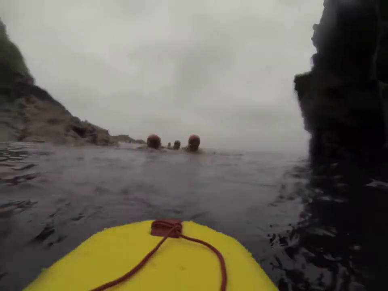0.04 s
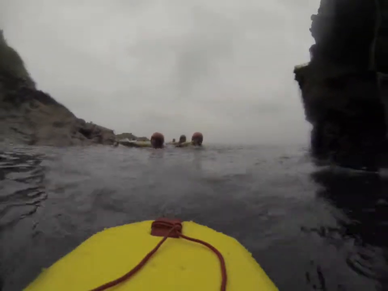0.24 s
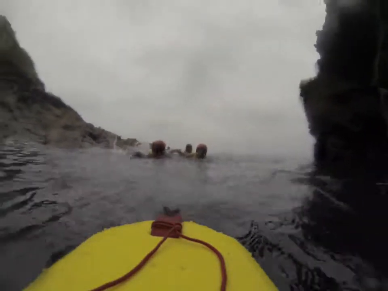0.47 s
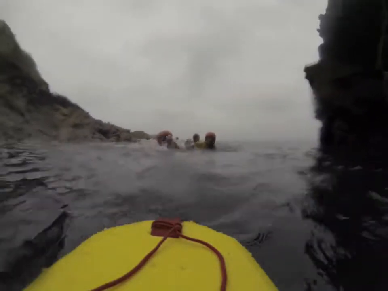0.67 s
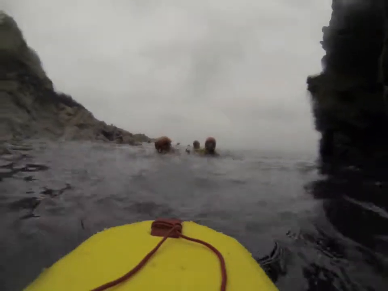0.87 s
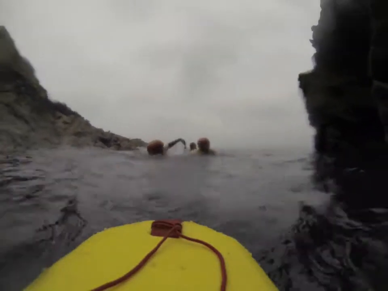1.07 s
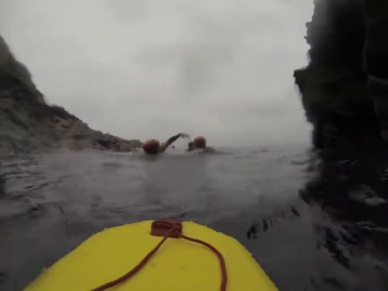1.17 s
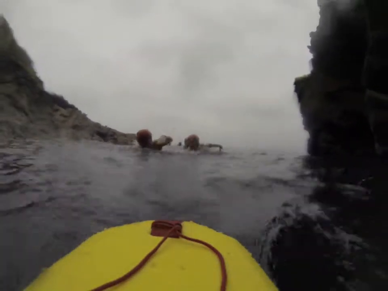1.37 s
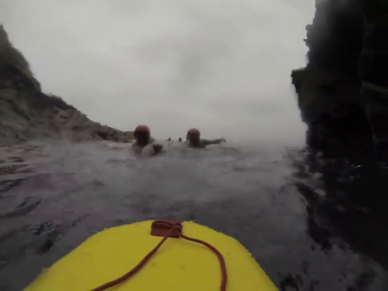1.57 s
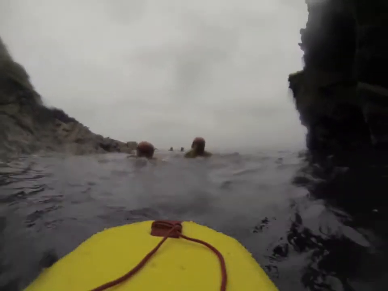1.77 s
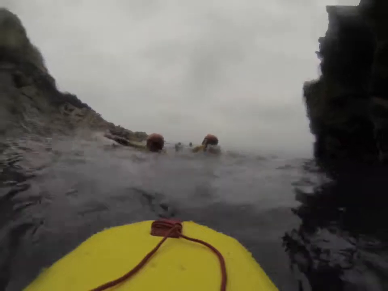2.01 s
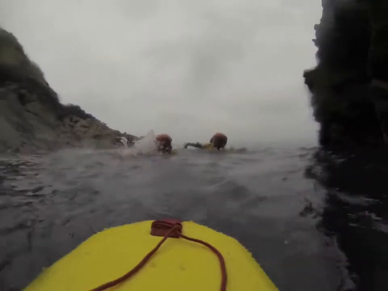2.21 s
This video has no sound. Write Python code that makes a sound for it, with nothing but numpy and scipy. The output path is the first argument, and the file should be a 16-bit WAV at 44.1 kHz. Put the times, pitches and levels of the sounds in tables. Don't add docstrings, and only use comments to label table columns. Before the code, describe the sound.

Choppy sea water slaps and thumps dully against a floating board, heard through a sealed housing

```python
import sys
import numpy as np
from scipy import signal
from scipy.fft import rfft, irfft
from scipy.io import wavfile
from scipy.ndimage import uniform_filter1d

SR = 44100
rng = np.random.default_rng(int(sys.argv[2]) if len(sys.argv) > 2 else 0)


def bounce(signal):
    frames = np.transpose(np.atleast_2d(signal))
    limited = np.clip(frames, -1, 1)
    pcm = np.round(limited * 32767).astype(np.int16)
    wavfile.write(sys.argv[1], SR, pcm)


def gain_from_decibels(decibels):
    exponent = np.asarray(decibels, float) / 20
    return 10 ** exponent


N = 99225

# t/s, peak level/dB, f/Hz, swell time/s
HEAVES = [(0.0, -37.5, 24, 0.046), (0.17, -38, 24, 0.05), (0.325, -26.5, 23.45, 0.041),
          (0.47, -32, 25, 0.031), (0.602, -19.5, 23, 0.031), (0.775, -38, 27, 0.03),
          (0.895, -28.5, 24.6, 0.031), (1.145, -57, 25.7, 0.014), (1.21, -45, 24, 0.063),
          (1.28, -40.5, 26.4, 0.045), (1.345, -39, 21.6, .04), (1.445, -35, 29.1, 0.051),
          (1.56, -33.5, 24.8, 0.024), (1.66, -34, 24, 0.022), (1.845, -25.5, 21.6, 0.028),
          (1.95, -35.5, 23.2, 0.032), (2.13, -37.5, 24, 0.062)]
# t/s, peak level/dB, f/Hz, swell time/s
SLAPS = [(0.5825, -15.5, 66, 0.006), (0.5852, -19, 180, 0.003), (0.5825, -29.5, 350, 0.0035),
         (0.606, -38, 200, .005), (0.9075, -41, 370, .004), (0.847, -47, 400, .002),
         (1.131, -49, 440, .003), (1.288, -47, 150, .004), (0.316, -46, 330, .003), (0.283, -47, 330, .003),
         (0.727, -52, 441, .004), (2.056, -50, 270, .004), (2.078, -36, 60, .006),
         (0.9065, -28.5, 100, 0.004), (0.9105, -32.5, 230, 0.004), (1.1345, -40, 202, 0.0045),
         (1.3295, -35.5, 107, 0.0031), (1.333, -34.5, 218, 0.0037), (2.0825, -29.5, 170, 0.0037)]
# t/s, peak level/dB, f/Hz, swell time/s
THUMPS = [(0.18, -45, 79, 0.011), (0.245, -35, 60, 0.0062), (0.293, -30, 83, 0.0092),
          (0.36, -51, 93.5, .01), (0.602, -25, 45, 0.007), (0.606, -33, 92, 0.007), (0.7, -46, 90, .01),
          (0.78, -48.5, 88.6, .01), (1.38, -51, 90, .008), (1.452, -37, 69.5, 0.0057),
          (1.784, -39, 63.6, 0.0081), (1.82, -27.5, 70, 0.0066), (2.1, -39, 69.6, .006)]
# t/s, peak level/dB, f/Hz, swell time/s
KNOCKS = [(0.015, -43, 185, 0.0035), (0.164, -46.5, 206, 0.0085), (0.195, -48, 210, 0.0068),
          (0.233, -36.5, 220, 0.003), (0.26, -37.5, 220, 0.004), (0.284, -40, 212, 0.0055),
          (0.318, -42, 221, 0.0013), (0.335, -38, 205, 0.0054), (0.39, -46, 232, 0.0046),
          (0.08, -57, 203, 0.011), (0.49, -50, 199, 0.0057), (0.52, -48, 202, .008),
          (0.645, -42, 207, 0.0042), (0.694, -41.5, 193, 0.0035), (0.775, -46, 210, 0.0073),
          (0.856, -45, 224, 0.0054), (0.925, -43, 190, 0.004), (1.365, -40.5, 205, 0.0051),
          (1.452, -48, 205, 0.0039), (1.772, -36, 221, 0.0033), (1.803, -29, 225, 0.0043),
          (1.83, -35, 211, 0.0033), (1.985, -51, 202, 0.0067)]
# f/Hz, t60/s, level/dB
HULL_MODES = [
    (24, 0.24, 7),
    (55, 0.053, 0.5),
    (82, 0.06, -0.5),
    (205, 0.037, -3.5),
]
# t/s, peak level/dB, f/Hz, swell time/s
DROPS = [(0.331, -40, 1438, 0.0028), (0.615, -44, 1570, 0.0022), (0.8465, -28.5, 1402, 0.0018),
         (0.853, -49, 1520, 0.0024), (0.8475, -48.5, 3600, 0.0014), (0.847, -72, 13900, .0015),
         (0.8458, -62, 8000, .0007), (0.846, -63, 9700, .0007), (0.915, -46.5, 3370, 0.0025),
         (0.9125, -43, 1300, 0.0053), (0.911, -50, 656, .003), (1.083, -44.5, 1730, 0.0019),
         (1.097, -54.5, 6700, 0.0011), (1.097, -64, 9900, 0.00081), (1.097, -42, 880, 0.0014),
         (1.098, -53, 3700, 0.0016), (1.329, -45, 606, 0.0022), (1.683, -47, 2300, 0.0013),
         (1.754, -49, 2300, .0012), (1.33, -43, 1300, .001), (1.865, -51, 2250, .002),
         (1.94, -55, 2300, .002), (1.645, -57, 3700, .0015), (1.655, -58, 5000, .0015),
         (2.083, -52, 3300, .001), (2.116, -50, 2250, .0012), (2.128, -51, 3500, .0012),
         (2.148, -53, 4500, .0012), (2.136, -58, 6400, .001), (1.805, -50.5, 455, 0.005),
         (1.989, -38, 1290, 0.0015), (2.023, -40, 1420, 0.0015), (2.09, -47, 3630, 0.0013),
         (2.149, -46.5, 2250, 0.0016), (2.22, -52, 649, 0.016)]
# t/s, peak level/dB, start f/Hz, swell time/s
BUBBLES = [
    (0.8462, -52, 10000, 0.0012),
    (1.445, -57.5, 6800, 0.0008),
]
# t/s, level/dB, swell time/s
SPRAYS = [(0.39, -63, 0.011), (1.08, -64, .004), (1.602, -57, 0.003), (1.64, -58, 0.01), (1.675, -63, .005),
          (1.86, -62, .02), (2.066, -61, .003), (2.081, -56, 0.003), (2.089, -55, .003), (2.103, -60, .004),
          (2.114, -60, 0.003), (2.134, -57, 0.004), (2.142, -58, .003), (2.148, -55, 0.004),
          (2.158, -61, .012)]
# t/s, level/dB
CHOP = [(0, 1.5), (.1, 0), (.35, 8), (.5, 1.5), (.8, 3), (.95, -1), (1.05, -6), (1.25, -5), (1.45, 0),
        (1.53, -8), (1.65, -10), (1.85, 7.5), (2.0, 2), (2.15, -3.5), (2.25, -6)]
# t/s, level/dB
WASH = [
    (0.0, -54.5),
    (0.13, -55),
    (0.34, -53.5),
    (0.94, -51),
    (1.07, -53.5),
    (1.32, -53.5),
    (2.06, -52),
    (2.25, -52.5),
]
# f/Hz, level/dB per Hz
WALLS = [(100, -10), (300, -8.5), (600, -15.5), (1000, -19), (2000, -18), (5500, -33), (10000, -37.5),
         (15000, -42.5)]
# f/Hz, width/Hz, level/dB
CAVITY = [(802, 227, -10), (1384, 307, -0.5), (2290, 260, -17.5), (3547, 680, -13.5), (4940, 740, -24.5),
          (6340, 650, -28.5), (7600, 610, -34.5), (11100, 440, -39)]


def rms_one(x):
    return x / np.sqrt(np.mean(x ** 2) + 1e-20)


def drift(rate_hz):
    r = np.exp(-2 * np.pi * rate_hz * 40 / SR)
    noise = rng.standard_normal(N // 40 + 2002)
    slow = signal.lfilter([1], [1, -2 * r, r * r], noise)[2000:]
    return np.interp(np.arange(N) / 40, np.arange(len(slow)), rms_one(slow - slow.mean()))


def over_time(table):
    t_s, level_db = np.transpose(table)
    return np.interp(np.arange(N) / SR, t_s, level_db)


def band(x, band_hz):
    return signal.sosfilt(signal.butter(2, band_hz, "band", fs=SR, output="sos"), x)


def swell(start_s, swell_s):
    t = np.maximum(np.arange(N) / SR - start_s, 0)
    return t, t / swell_s * np.exp(1 - t / swell_s)


def rings(rows, order=1, rise_per_s=0):
    out = np.zeros(N)
    for start_s, peak_db, hz, swell_s in rows:
        t, shape = swell(start_s, swell_s)
        glide = 1 + rise_per_s * np.minimum(t, 4 * swell_s) / 2
        out += gain_from_decibels(peak_db) * shape ** order * np.sin(2 * np.pi * hz * t * glide)
    return out


def case(x):
    hz = np.maximum(np.fft.rfftfreq(N, 1 / SR), 20)
    wall_hz, wall_db = np.transpose(WALLS)
    power = gain_from_decibels(2 * np.interp(np.log(hz), np.log(wall_hz), wall_db))
    for centre_hz, width_hz, db in CAVITY:
        power = power + gain_from_decibels(2 * db) / (1 + (2 * (hz - centre_hz) / width_hz) ** 4)
    low_cut = hz ** 2 / (hz ** 2 + 60 ** 2)
    return irfft(rfft(x) * np.sqrt(power) * low_cut, N)


def board():
    return rings(HEAVES) + rings(THUMPS) + rings(KNOCKS) + rings(SLAPS, order=2)


def drops():
    return rings(DROPS, order=2)


def bubbles():
    return rings(BUBBLES, order=2, rise_per_s=70)


def spray():
    bright = band(rng.standard_normal(N), (2800, 14000))
    bursts = np.zeros(N)
    for start_s, level_db, swell_s in SPRAYS:
        bursts += gain_from_decibels(level_db) * swell(start_s, swell_s)[1]
    grain_db = 3 * drift(105)
    return case(bright * bursts * gain_from_decibels(grain_db)) / np.std(case(bright))


def ripples():
    laps_per_s, lap_db, patchy_db = 99, -61, 3.5
    out = np.zeros(N)
    for hz, t60_s, mode_db in HULL_MODES:
        taps = (rng.random(N) < laps_per_s / SR) * rng.standard_normal(N) + 1e-18
        soft_taps = uniform_filter1d(taps, int(SR / hz / 2))
        r, w = gain_from_decibels(-60 / (t60_s * SR)), 2 * np.pi * hz / SR
        ring = signal.lfilter([1], [1, -2 * r * np.cos(w), r * r], soft_taps)
        ring = signal.lfilter([1, -1], [1, -.998], ring)
        out += gain_from_decibels(mode_db + patchy_db * drift(5.7)) * rms_one(ring)
    return gain_from_decibels(lap_db + over_time(CHOP)) * out


def slosh():
    water = rms_one(band(rng.standard_normal(N), (310, 980)))
    return gain_from_decibels(-66 + 1.17 * over_time(CHOP) + 2.27 * drift(25)) * water


def gurgles():
    per_s, level_db, low_hz, high_hz = 30, -57, 420, 1700
    at, height, quiet, length = rng.random((int(per_s * N / SR), 4)).T
    start_s = at * N / SR
    peak_db = level_db + np.interp(start_s, *np.transpose(CHOP)) / 2 - 8 * quiet
    hz = low_hz * (high_hz / low_hz) ** height
    swell_s = .006 + .014 * length
    return rings(zip(start_s, peak_db, hz, swell_s), order=2, rise_per_s=4)


def wash():
    patchy_db, grain_db, patches_fade_hz = 2.5, 0.5, 2470
    edges_hz = 40 * 2 ** np.arange(0, 9.5)
    white = rng.standard_normal((2, N))
    noise = np.zeros(N)
    for k, (low_hz, high_hz) in enumerate(zip(edges_hz, edges_hz[1:])):
        patches_db = patchy_db * drift(6.7) + grain_db * drift(57)
        octave = band(white[k % 2], [low_hz, high_hz])
        noise += octave * gain_from_decibels(patches_db / (1 + low_hz / patches_fade_hz))
    return rms_one(case(noise)) * gain_from_decibels(over_time(WASH))


def treble_dropouts(x):
    above_db, flutter_db = -36, 8
    level_db = 10 * np.log10(uniform_filter1d(x ** 2, SR // 12) + 1e-12)
    hz, edges_hz = np.fft.rfftfreq(N, 1 / SR), np.linspace(12700, 15100, 7)
    out = x.copy()
    for k, (low_hz, high_hz) in enumerate(zip(edges_hz, edges_hz[1:])):
        lost = level_db + flutter_db * drift(14) + 2 * k > above_db + 6
        strip = irfft(rfft(x) * ((hz >= low_hz) & (hz < high_hz)), N)
        out -= strip * uniform_filter1d(lost * 1., 400)
    return out


def scene():
    near = board() + drops() + bubbles() + spray()
    around = ripples() + slosh() + gurgles() + wash()
    return (near + around)[None]


def band_limit(x):
    return signal.sosfilt(signal.butter(12, 15000, fs=SR, output="sos"), x)


def record(dry):
    dull = signal.sosfilt(signal.butter(8, 14900, fs=SR, output="sos"), dry)
    mix = treble_dropouts(dull)
    return band_limit(mix)


dry = scene()
out = record(dry)
bounce(out)
```